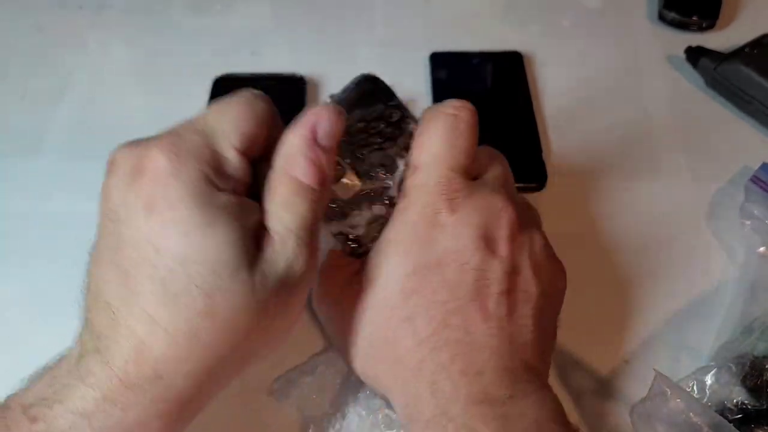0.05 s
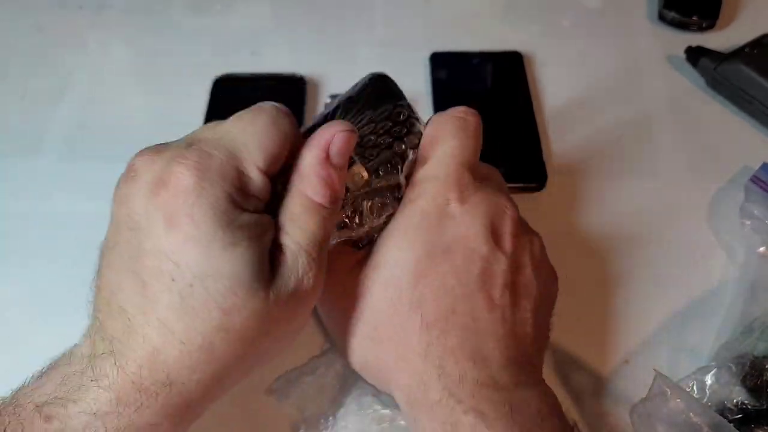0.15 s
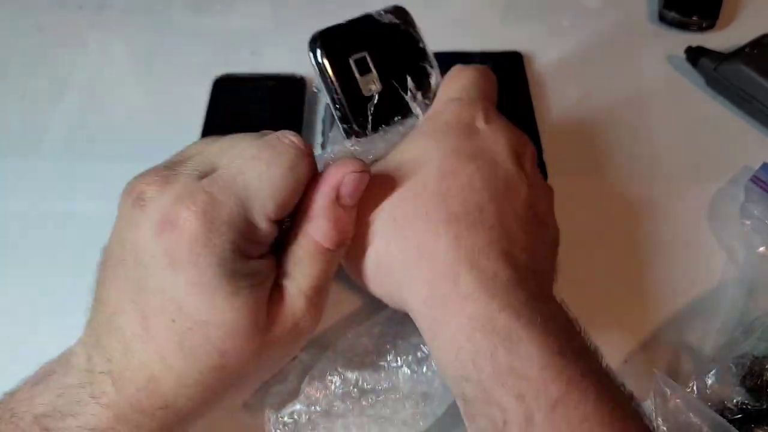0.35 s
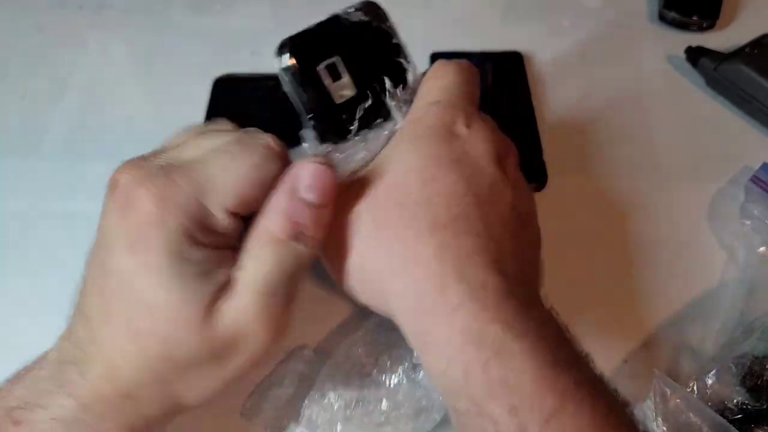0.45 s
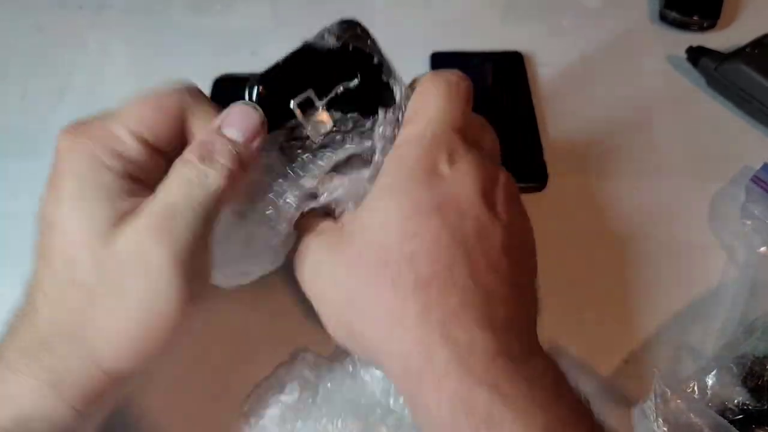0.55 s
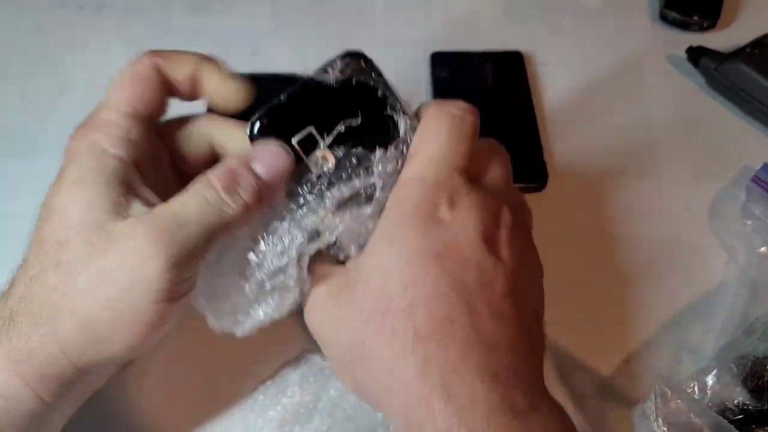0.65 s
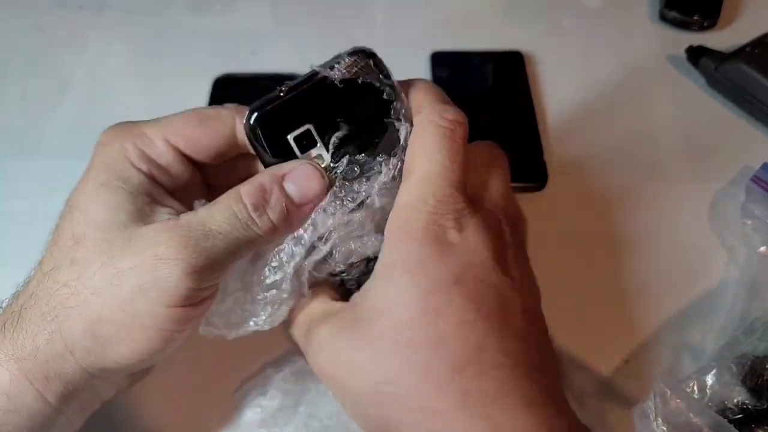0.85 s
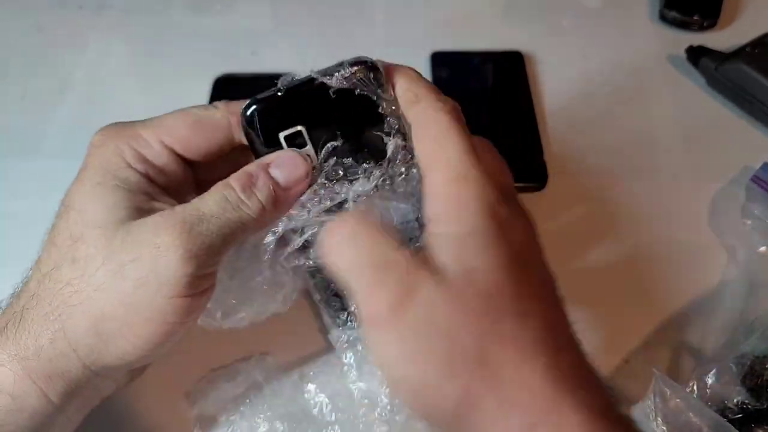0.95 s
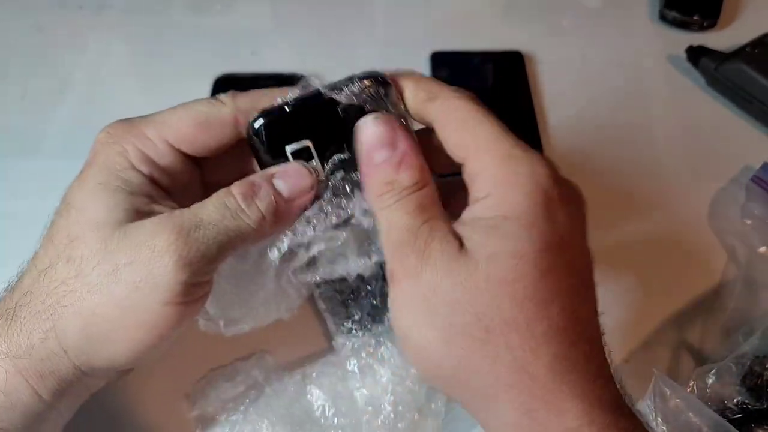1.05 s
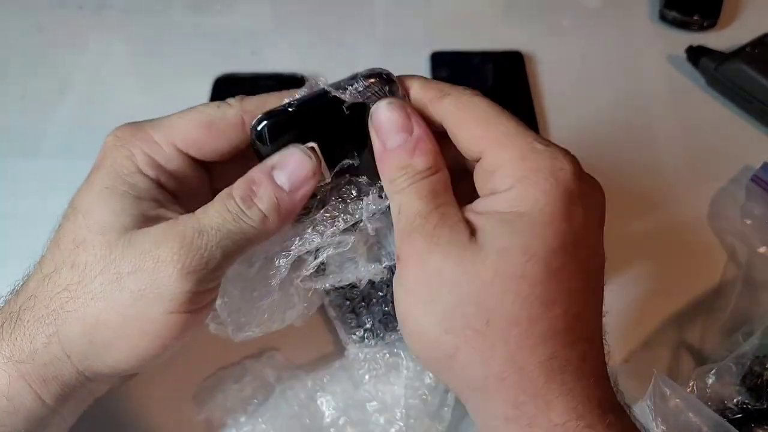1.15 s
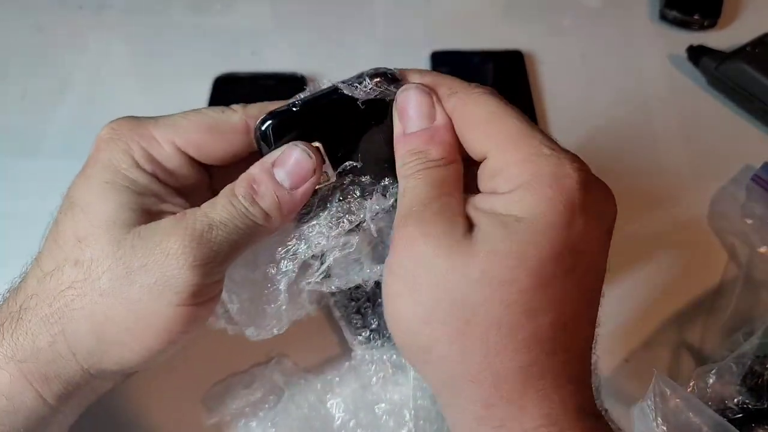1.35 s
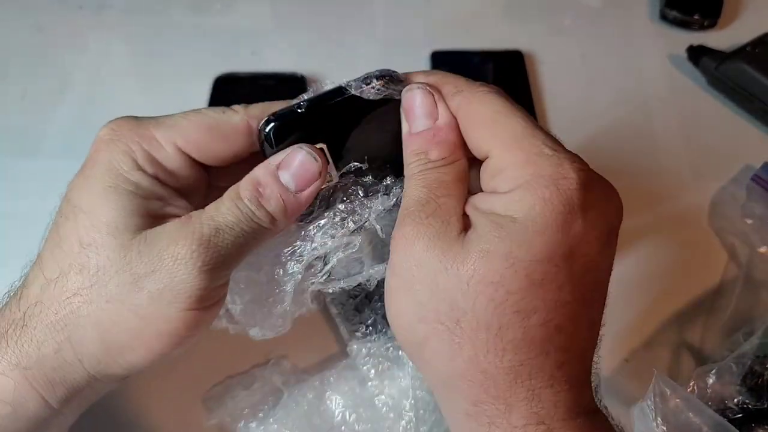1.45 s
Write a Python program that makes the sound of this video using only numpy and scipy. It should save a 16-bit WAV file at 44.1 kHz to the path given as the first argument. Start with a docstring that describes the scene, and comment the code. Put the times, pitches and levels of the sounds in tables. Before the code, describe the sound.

Bubble wrap crinkles close by as hands pull it off a small object. Light rustling and a few snaps lead to the loudest crackling tug at about 0.3 seconds, with a soft low thump. Tiny high ticks follow near 0.5 seconds. Quieter rustling and scattered crackles continue, with a small cluster around 1.3 to 1.4 seconds. The snaps echo briefly in a small room over a faint hiss.

```python
"""Bubble wrap crackles as hands pull it off a small object over a table, close by in a small room.
Creases in the plastic film buckle and snap: each gives a crack and a brief ring. The sliding film
rustles with countless tiny slips, and film that clings to itself lets go in tiny high ticks.
The hardest tug comes with a soft low thump. The snaps echo briefly over a faint steady hiss."""
import sys
import numpy as np
from scipy import signal
from scipy.fft import rfft, irfft
from scipy.io import wavfile

SR = 44100
rng = np.random.default_rng(int(sys.argv[2]) if len(sys.argv) > 2 else 0)


def materialize(psi):
    """Save the field psi as 16-bit PCM at rate SR to the path in sys.argv[1].

    A 1-D psi becomes a single channel; in a 2-D psi each row is a channel.
    """
    bounded = np.clip(np.atleast_2d(psi).T, -1, 1)
    quanta = np.round(bounded * 32767).astype(np.int16)
    wavfile.write(sys.argv[1], SR, quanta)


N = 66150  # 1.5 seconds

# Creases snapping: start_s, pitch_hz, ring_db, crack_db, decay_s, pan_db (above 0 is to the left)
SNAPS = [(.033, 1210, -57, -61, .003, 6), (0.054, 1810, -50.5, -63, 0.0016, -9),
         (.119, 2200, -59, -58, 0.0018, 0), (.185, 600, -52.5, -51, 0.0016, 3),
         (0.2033, 2180, -52.5, -45, 0.0033, -14), (.2066, 1410, -33, -43, 0.0011, -2),
         (.2069, 4440, -27, -45, 0.0014, 4.5), (0.2086, 4960, -34, -29.5, 0.0019, 4),
         (.219, 3800, -47, -49, 0.0017, -13), (.2285, 1000, -37, -39.5, 0.00088, 3),
         (0.27, 800, -47, -56, 0.0012, -4), (0.2761, 3030, -37.5, -47, 0.00062, -5),
         (0.3007, 1020, -35, -35, .002, -2), (0.302, 3860, -37, -34, 0.0018, -4),
         (0.3044, 800, -38, -43, 0.0043, 14), (.309, 1120, -30, -30.5, 0.00084, -5),
         (.311, 2920, -39, -52, 0.0013, -5), (0.316, 2030, -39, -36, 0.0026, 3),
         (0.3213, 2300, -25.5, -28, 0.0014, 0), (0.3248, 1674, -23.5, -41, 0.0012, -0.5),
         (0.3239, 2760, -28.5, -36, 0.00064, 8), (0.3256, 2640, -39, -28, 0.0039, -1.5),
         (.336, 1700, -38, -35, 0.0026, 2), (0.344, 2300, -59, -37, 0.0032, -5),
         (.3515, 2420, -49, -52, 0.002, -10), (.544, 3000, -50, -56, .002, 3),
         (0.5733, 2600, -35.5, -58, 0.0018, 2), (0.5727, 4500, -41.5, -58, .0008, 4),
         (0.575, 900, -48.5, -60, 0.0016, 4), (.581, 2600, -47, -47, .002, 1),
         (0.613, 5040, -46, -61, 0.00091, -4), (.616, 440, -50.5, -49, 0.0024, -3),
         (.654, 3780, -47.5, -54, 0.00082, 3), (0.666, 1200, -53, -54, 0.0036, 0),
         (.689, 2960, -57, -44, 0.004, 0), (0.6914, 1420, -38.5, -64, 0.0015, 0),
         (.696, 520, -44, -54, 0.0027, 0), (.7275, 1070, -51, -62, 0.00079, 0),
         (.729, 3700, -48.5, -53, 0.0017, 9), (.746, 1700, -48, -55, 0.0014, -1),
         (.788, 3640, -48.5, -49.5, 0.0016, 4), (0.999, 1300, -46, -56, 0.0054, -2),
         (1.01, 6600, -52, -63, .001, 3), (1.049, 6100, -50.5, -62, .0015, 8),
         (1.068, 1210, -47, -48, .003, -1), (1.11, 1700, -49, -55, 0.0013, 1),
         (1.115, 523, -53, -52, 0.003, -1), (1.1974, 1500, -46, -62, 0.002, 4),
         (1.2022, 3620, -47, -53, 0.0035, -4), (1.215, 3780, -44.5, -47, 0.0028, 5),
         (1.327, 5600, -44.5, -52, 0.0023, 8), (1.3308, 6200, -41, -44, 0.0018, -4),
         (1.3319, 2380, -47.5, -74, 0.002, -1), (1.3398, 4670, -49, -53, .0018, 7),
         (1.3416, 2010, -52, -46, 0.0023, 6), (1.3913, 1270, -51, -59, .0015, 1),
         (1.396, 6000, -50, -39.5, 0.0027, 5), (1.406, 11100, -51, -57, .005, -13),
         (1.435, 1280, -54.5, -46, 0.0022, 1), (1.445, 11100, -63, -60, 0.0012, 5)]
# Tone of a snap's crack: frequency_hz, gain_db
CRACK_TONE = [(100, -26.5), (230, -6.5), (600, -7.5), (1500, -5.5), (3000, -7), (6500, 1.5), (9000, -4),
              (14500, -1)]
# Loudness of the sliding film: time_s, level_db
SLIDE_LEVEL = [(0, -51.5), (.16, -52.5), (.2, -49), (.235, -50), (.295, -44), (.305, -30), (.335, -35),
               (.37, -42.5), (.43, -44), (.52, -50), (.59, -49), (.69, -46.5), (.715, -54.5), (.93, -55.5),
               (1.005, -51), (1.08, -55.5), (1.15, -59), (1.5, -59.5)]
# Tone of the sliding film: frequency_hz, gain_db
SLIDE_TONE = [(100, -23), (220, -23), (500, -13.5), (720, -8), (1050, -14), (1900, -0.5), (2900, 1.5),
              (5000, -2), (7000, 0), (8000, -12.5), (14500, -20)]
# Tone of the rumble from handling the wrap: frequency_hz, gain_db
RUMBLE_TONE = [(20, -9), (60, 7), (150, -7.5), (400, -14.5), (2000, -57)]
# Notes of the hollow between wrap and hands: pitch_hz, width_hz, gain_db
HOLLOW_NOTES = [(1355, 76, -0.5), (1607, 37, -6), (1795, 76, -1.5), (2700, 100, -20), (2990, 120, -12)]
# How loudly that hollow rings: time_s, level_db
HOLLOW_LEVEL = [(0, -70), (.28, -60), (.33, -47.5), (.4, -53.5), (.5, -64), (.8, -68.5), (.92, -58),
                (1.02, -56), (1.16, -67), (1.27, -71), (1.5, -72)]
# Loudness of fingers rubbing the film: time_s, level_db
FINGER_LEVEL = [(0, -60.5), (.16, -63.5), (.22, -55.5), (.29, -59.5), (.31, -49.5), (.37, -53), (.5, -67.5),
                (.6, -60), (.69, -59), (.73, -64), (.88, -65), (.93, -61.5), (1.02, -58.5), (1.12, -62),
                (1.25, -71.5), (1.41, -74), (1.44, -67), (1.5, -79)]
# Dull tone of the fingers: frequency_hz, gain_db
FINGER_TONE = [(100, -17), (220, -1), (300, -5.5), (385, 3.5), (470, -3), (640, 0), (800, -3), (1200, -3),
               (2500, -17), (8000, -45)]
# Loudness of the film's high fizz: time_s, level_db
FIZZ_LEVEL = [(0, -56), (.19, -54.5), (.225, -47), (.295, -51.5), (.305, -34), (.35, -37), (.375, -50),
              (.43, -52.5), (.52, -56.5), (.68, -51.5), (.72, -61), (.93, -61), (1.01, -54.5),
              (1.16, -63.5), (1.385, -62), (1.41, -58), (1.5, -62)]
# Tone of that fizz: frequency_hz, gain_db
FIZZ_TONE = [(300, -54), (4000, 1), (7500, 0.5), (11000, 3.5), (14500, -3.5)]
# Clinging film letting go: time_s, level_db
TICKS = [(0.4465, -41.5), (.4528, -48), (.4602, -52), (.469, -48), (.4808, -42), (0.4853, -34),
         (.4892, -46), (.494, -42), (0.501, -44), (1.3234, -45.5), (1.3972, -40)]
# Bright tone of a tick: frequency_hz, gain_db
TICK_TONE = [(200, -50), (4000, -39), (6000, -3), (8200, 8.5), (10500, 0.5), (14500, -2)]
# Soft bumps of the hands: start_s, pitch_hz, level_db, rise_s, decay_s
THUMPS = [(0.3181, 91.6, -42, 0.003, 0.03), (0.402, 94.2, -51.5, 0.032, 0.034),
          (.697, 63, -63, 0.0077, 0.013), (1.013, 92.5, -55.5, 0.021, 0.0097)]
# Time the room's echo takes to fade by 60 dB: frequency_hz, fade_s
ECHO_FADE = [(200, 0.4), (1500, .35), (5000, 0.57), (14000, 0.17)]
# Tone of the quiet room: frequency_hz, gain_db
HISS_TONE = [(20, 2.5), (100, -3.5), (220, -0.5), (1000, -12), (4000, -1.5), (14500, -12)]
# How alike left and right sound: frequency_hz, likeness (0 to 1)
STEREO_LIKENESS = [(60, 0.29), (150, 0.78), (500, 0.83), (1500, 0.43), (3000, 0.15), (6000, 0.024),
                   (14000, 0.088)]
# How much louder left is than right: frequency_hz, pan_db
STEREO_BALANCE = [(200, 1.5), (1500, 0), (4000, 0.5), (7000, 3.5), (7900, -9), (9500, 0.5), (14000, 0)]

CUTOFF_HZ = 14750
TIME_S = np.arange(N) / SR
FREQUENCY_HZ = np.fft.rfftfreq(N, 1 / SR)


def crease_snaps():
    """Each buckling crease cracks and briefly rings its patch of film."""
    out = np.zeros((2, N))
    for start_s, pitch_hz, ring_db, crack_db, decay_s, pan_db in SNAPS:
        ring = resonate(film_jolt(decay_s, flutter=1.7), pitch_hz, sharpness=2)
        soften = signal.butter(2, min(pitch_hz * 2.13, CUTOFF_HZ), fs=SR)
        ring = signal.lfilter(*soften, ring)
        crack = shape_tone(film_jolt(decay_s, flutter=7), CRACK_TONE)  # mostly shiver
        snap = at_level(ring, ring_db) + at_level(crack, crack_db)
        add(out, start_s, snap * pan(pan_db))
    return out


def film_jolt(decay_s, flutter, size=2048):
    """A sudden jolt of the film, then a shiver whose strength is set by flutter."""
    likeness, rise_s = 0.44, 0.00074
    t = np.arange(size) / SR
    noise = rng.standard_normal((3, size))  # shared, left, right
    shiver = np.sqrt(likeness) * noise[0] + np.sqrt(1 - likeness) * noise[1:]
    shiver = shiver * np.exp(-t / decay_s) * (1 - np.exp(-t / rise_s))
    strength = flutter * decay_s / 0.0018  # longer snaps shiver more
    jolt = t == 0
    return jolt + strength * unit(shiver) / np.sqrt(size)


def film_rustle():
    """Film and fingers rub, rumble and fizz; the sliding rings the hollow and the tight film."""
    rub = friction(SLIDE_TONE) + gain(-26) * friction(RUMBLE_TONE)
    ringing = hollow_ring() + tight_film()
    fingers = friction(FINGER_TONE) * loudness(FINGER_LEVEL)
    fizz = friction(FIZZ_TONE) * loudness(FIZZ_LEVEL)
    return rub * loudness(SLIDE_LEVEL) + ringing + fingers + fizz


def tiny_slips(slips_per_s=3500, smooth_share=0.56):
    """Countless tiny slips of uneven size over a smooth rub."""
    sizes = gain(3 * np.minimum(rng.exponential(1, (2, N)), 4.5))
    signs = rng.choice([-1, 1], (2, N))
    slipping = rng.random((2, N)) < slips_per_s / SR
    grainy = np.sqrt(1 - smooth_share) * unit(sizes * signs * slipping)
    smooth = np.sqrt(smooth_share) * rng.standard_normal((2, N))
    return widen(grainy + smooth)


def friction(tone):
    """Steady rubbing: tiny slips with the given tone."""
    return unit(shape_tone(tiny_slips(), tone))


def hollow_ring():
    """Slips ring the hollow between the wrap and the hands."""
    notes = sum(gain(level_db) * unit(resonate(tiny_slips(), pitch_hz, pitch_hz / width_hz))
                for pitch_hz, width_hz, level_db in HOLLOW_NOTES)
    return unit(notes) * loudness(HOLLOW_LEVEL)


def tight_film(start_s=0.325, decay_s=0.14):
    """The tug pulls the film tight, and it sings while the tension lasts."""
    ring = unit(resonate(tiny_slips(), pitch_hz=1840, sharpness=9.3))
    fade = (TIME_S > start_s) * np.exp(-abs(TIME_S - start_s) / decay_s)
    return gain(-45.5) * ring * fade


def peel_ticks(width_s=0.00066, size=512):
    """Very short, high ticks as film peels from film."""
    out = np.zeros((2, N))
    t = np.arange(size) / SR
    for time_s, level_db in TICKS:
        burst = rng.standard_normal((2, size)) * np.exp(-(t / width_s - 1) ** 2)
        tick = at_level(shape_tone(burst, TICK_TONE), level_db)
        add(out, time_s - width_s / 2, tick * pan(-5))
    return out


def faint_crinkles(per_pitch_per_s=22):
    """Small creases ring at random moments on 16 pitches, louder as more film slides."""
    out = np.zeros((2, N))
    for pitch_hz in np.geomspace(1300, 9000, 16):
        sizes = gain(3 * np.minimum(rng.exponential(1, N), 3))
        creasing = rng.random(N) < per_pitch_per_s / SR
        clicks = sizes * creasing * pan(rng.normal(1, 11.5, N))
        out += unit(resonate(clicks, pitch_hz, sharpness=10))
    return gain(-10.5) * unit(out) * loudness(SLIDE_LEVEL)


def air_push(peak_s=0.3245, pitch_hz=57, width_s=0.0069):
    """The hardest tug shoves the air in one low pulse."""
    t = TIME_S - peak_s
    return -gain(-43.5) * np.exp(-(t / width_s) ** 2 / 2) * np.cos(2 * np.pi * pitch_hz * t)


def hand_thumps():
    """Soft bumps of the hands: low tones that swell and die away."""
    out = np.zeros(N)
    for start_s, pitch_hz, level_db, rise_s, decay_s in THUMPS:
        t = np.maximum(TIME_S - start_s, 0)
        swell = np.minimum(t / rise_s, 1)
        fade = np.exp(-np.maximum(t - rise_s, 0) / decay_s)
        out += gain(level_db) * swell * fade * np.sin(2 * np.pi * pitch_hz * t)
    return out


def room_echo(sound, rise_s=0.0041):
    """Reflections blur into a short tail, each frequency fading at its own speed."""
    hz, t, bands = signal.stft(rng.standard_normal((2, SR // 2)), SR, nperseg=256)
    fade = gain(-60 * t / look_up(ECHO_FADE, hz)[:, None])
    tail = signal.istft(bands * fade, SR)[1]
    tail *= np.minimum(np.arange(tail.shape[1]) / SR / rise_s, 1)
    return signal.fftconvolve(sound, tail / np.linalg.norm(tail[0]), axes=1)[:, :N]


def room_hiss():
    """The faint steady noise of the quiet room."""
    noise = widen(rng.standard_normal((2, N)))
    return gain(-67) * unit(shape_tone(noise, HISS_TONE))


def gain(db):
    """Turns decibels into a multiplier."""
    return 10 ** (np.asarray(db) / 20)


def unit(sound):
    """Scales a sound to an average (rms) level of 1."""
    return sound / np.sqrt(np.mean(sound ** 2) + 1e-20)


def at_level(sound, level_db, span_s=0.0034):
    """Gives a short sound the energy of level_db held for span_s."""
    return gain(level_db) * unit(sound) * np.sqrt(span_s * SR / sound.shape[1])


def loudness(curve):
    """Joins (time_s, level_db) points into a gain for every sample."""
    return gain(np.interp(TIME_S, *np.transpose(curve)))


def look_up(table, hz):
    """Reads between a table's rows, with frequency spaced by octaves."""
    row_hz, values = np.transpose(table)
    return np.interp(np.log(hz + 1), np.log(row_hz + 1), values)


def shape_tone(sound, tone):
    """Filters a sound by a tone table, ringing only after each click."""
    hz = abs(np.fft.fftfreq(sound.shape[-1], 1 / SR))
    log_gain = np.log(gain(look_up(tone, hz)))
    response = np.exp(np.conj(signal.hilbert(log_gain)))
    return np.fft.ifft(np.fft.fft(sound) * response).real


def resonate(sound, pitch_hz, sharpness):
    """Rings at one pitch; a sharper ring lasts longer."""
    return signal.lfilter(*signal.iirpeak(pitch_hz, sharpness, SR), sound)


def pan(db):
    """Left and right gains, with the left louder by db."""
    return gain(np.array([db, -db]).reshape(2, -1) / 2)


def widen(pair):
    """Blends two unrelated noises into stereo, alike in the bass and wide in the treble."""
    likeness = look_up(STEREO_LIKENESS, FREQUENCY_HZ)
    mid, side = rfft(pair) * np.sqrt([1 + likeness, 1 - likeness])
    balance = pan(look_up(STEREO_BALANCE, FREQUENCY_HZ))
    return irfft(np.array([mid + side, mid - side]) * balance, N)


def add(mix, start_s, sound):
    """Mixes a stereo sound in at start_s."""
    part = mix[:, max(round(start_s * SR), 0):][:, :sound.shape[1]]
    part += sound[:, :part.shape[1]]


def scene():
    """The wrap, the low thumps, the echo of the snaps and the quiet room."""
    snaps = crease_snaps()
    hiss = room_hiss()
    echo = gain(-9.5) * room_echo(snaps)
    wrap = snaps + peel_ticks() + faint_crinkles() + film_rustle()
    return wrap + air_push() + hand_thumps() + echo + hiss


def record(dry):
    """Removes the treble above CUTOFF_HZ."""
    low_pass = signal.firwin(255, CUTOFF_HZ, window=("kaiser", 9), fs=SR)
    return signal.oaconvolve(dry, low_pass[None], "same")


dry = scene()
out = record(dry)
materialize(out)
```